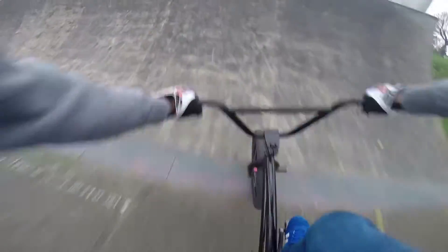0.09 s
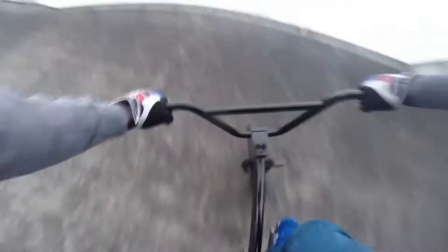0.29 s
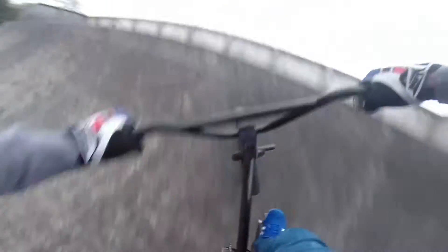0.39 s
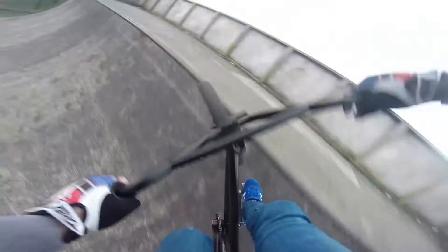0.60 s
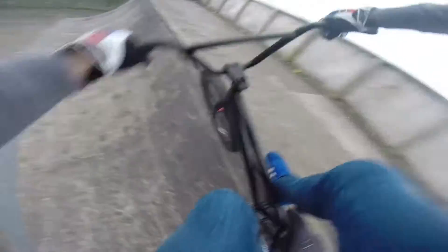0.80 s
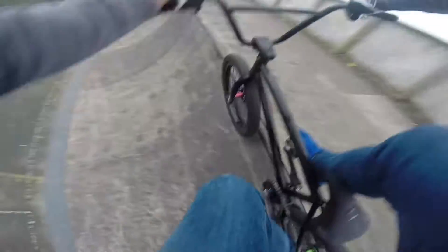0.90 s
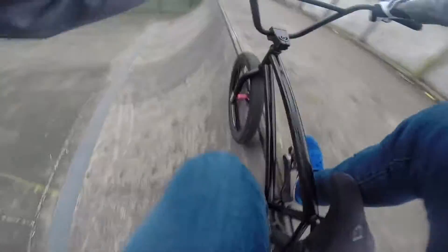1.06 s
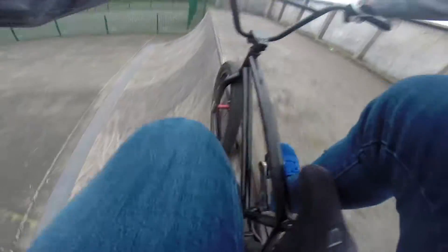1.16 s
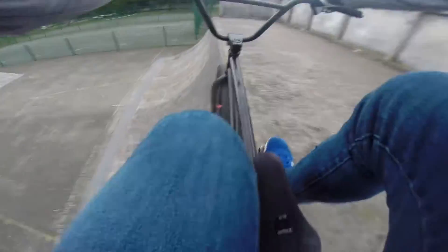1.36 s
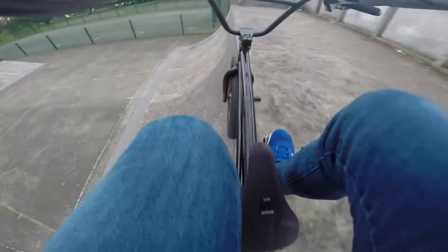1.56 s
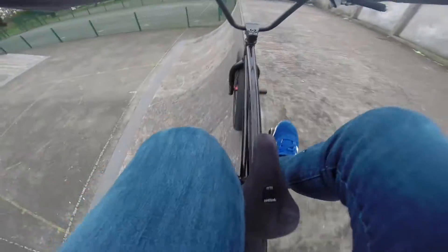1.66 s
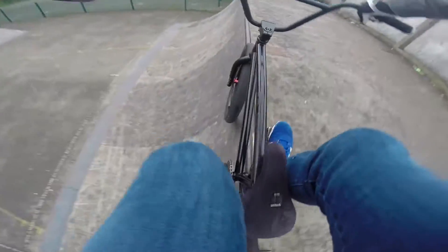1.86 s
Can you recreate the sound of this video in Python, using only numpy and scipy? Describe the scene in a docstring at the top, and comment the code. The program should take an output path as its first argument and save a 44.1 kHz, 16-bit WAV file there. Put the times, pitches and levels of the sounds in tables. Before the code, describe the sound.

BMX bike rolls over concrete, hops, and clanks into a short scraping peg grind.

```python
"""BMX peg grind on a ledge

A BMX bike coasts up a concrete ramp, hops, and lands two steel pegs on a ledge, where they grind along.
The freewheel ticks throughout; the tyres hiss and the frame rumbles. The microphone rides on the rider's
chest, close above the bike: its case is knocked a few times, and air buffets it."""
import sys
import numpy as np
from scipy import signal
from scipy.fft import rfft, irfft
from scipy.io import wavfile

SR = 44100
rng = np.random.default_rng(int(sys.argv[2]) if len(sys.argv) > 2 else 0)


def to_wav(sig):
    """Store sig (one row per channel, or 1-D mono) as 16-bit WAV at the path in sys.argv[1].

    Samples outside -1..1 are clipped; the rate is SR.
    """
    pcm = np.clip(np.atleast_2d(sig), -1, 1) * 32767
    pcm = np.round(pcm).astype(np.int16)
    wavfile.write(sys.argv[1], SR, pcm.T)  # frames by channels


N = 83790
T = np.arange(N) / SR


def from_db(db):
    """Decibels to gain."""
    return 10 ** (np.asarray(db) / 20)


def rms_one(x):
    """Scale to rms 1."""
    return x / np.sqrt(np.mean(x ** 2) + 1e-20)


def level(rows):
    """Gain over time from rows of (time [s], level [dB])."""
    return from_db(np.interp(T, *np.transpose(rows)))


def coloured(spectrum, source=None):
    """White noise, or a given source, shaped by a spectrum that falls away at both ends; rms 1."""
    source = rng.standard_normal(N) if source is None else source
    hz, db = np.transpose(spectrum)
    f = np.maximum(np.arange(N // 2 + 1) * SR / N, 1)
    skirts = np.minimum(f / hz[0], 1) ** 2 * np.minimum(hz[-1] / f, 1) ** 2
    shape = from_db(np.interp(np.log(f), np.log(hz), db))
    return rms_one(irfft(rfft(source) * skirts * shape, N))


def drift(rate_hz):
    """Smooth random wander, rms 1."""
    r = np.exp(-2 * np.pi * rate_hz / SR)
    return rms_one(signal.lfilter([1], [1, -2 * r, r * r], rng.standard_normal(2 * N))[N:])


def clicks(rows):
    """One impulse for each row of (time [s], level [dB])."""
    out = np.zeros(N) + 1e-18
    for s, db in rows:
        out[int(s * SR)] += from_db(db)
    return out


def ring(force, modes):
    """A force sets decaying modes ringing, with alternating signs."""
    out = np.zeros(N)
    for k, (hz, db, t60) in enumerate(modes):
        r, w = np.exp(-np.log(1000) / (t60 * SR)), 2 * np.pi * hz / SR
        mode = signal.lfilter([0, np.sin(w)], [1, -2 * r * np.cos(w), r * r], force)
        out += (-1) ** k * from_db(db) * mode
    return out


def dying(force, t60):
    """Envelope that jumps at each impulse and falls 60 dB in t60 seconds."""
    return signal.lfilter([1], [1, -np.exp(-np.log(1000) / (t60 * SR))], force)


def swell(start, length, db):
    """Rounded envelope of one short sound."""
    return from_db(db) * np.sqrt(np.abs(np.sin(np.pi * np.clip((T - start) / length, 0, 1))))


def grit(grains_per_s=5000, spread_db=2):
    """Dense random clicks of uneven size."""
    sizes = from_db(spread_db * np.minimum(rng.exponential(1, N), 5)) * rng.choice([-1, 1], N)
    return sizes * (rng.random(N) < grains_per_s / SR)


def freewheel(peak_s=.0022, flicker_db=1.8):
    """Each pawl drop is a fine click with a short rattle of the hub; the rate follows the rear wheel."""
    # the coasting hub: (time [s], tick rate [1/s], rattle level [dB], click level [dB])
    coasting = [(0, 75, -62.5, -72), (.35, 98, -64, -78), (0.601, 88, -55.5, -80), (.72, 84, -56, -77),
                (.82, 87, -52.5, -74), (1.001, 72, -50.5, -65), (1.3, 51, -50, -63.5), (1.5, 48, -58, -72),
                (1.9, 48, -58, -73)]
    # hub rattle and pawl click: (frequency [Hz], density [dB])
    hub = [(1600, -16), (2200, 2), (2750, -8), (3400, 7), (4000, -15.5), (5000, -5), (8000, -26)]
    pawl = [(6500, -8), (9500, -6), (12500, 0), (14500, -31)]
    times, *columns = np.transpose(coasting)
    rate, rattle_db, click_db = [np.interp(T, times, column) for column in columns]
    since_tick = (np.cumsum(rate) / SR % 1) / rate
    age = since_tick / peak_s
    ticks = rms_one(age * np.exp(-age)) * from_db(flicker_db * drift(23))
    return ticks * (from_db(rattle_db) * coloured(hub) + from_db(click_db) * coloured(pawl))


def wheels(whirr_db=-9):
    """Below the rider the tyres hiss on concrete and the spinning bearings whirr."""
    # rolling hiss and open air: (time [s], level [dB])
    loudness = [(0, -56.5), (.18, -49.5), (.3, -48.5), (.37, -49.5), (.43, -54), (.55, -57.5), (.65, -51.5),
                (.69, -60), (.85, -53), (1.0, -47.5), (1.8, -57.5), (1.9, -63)]
    # tyre hiss: (frequency [Hz], density [dB])
    tyre = [(240, -50), (400, -7.5), (867, -1), (1390, -4.5), (1540, -36), (2190, 7), (3150, -9.5),
            (3390, -6), (3890, -4), (5110, 0.5), (6920, -14.5), (13100, -22.5), (15000, -23)]
    # bearing modes: (frequency [Hz], level [dB], t60 [s])
    bearings = [(3306, 7, 0.081), (4877, 9.5, .06), (6010, 4.5, 0.1), (7350, -1, 0.16)]
    hiss = coloured(tyre)
    whirr = rms_one(ring(rng.standard_normal(N), bearings))
    return level(loudness) * (hiss + from_db(whirr_db) * whirr)


def frame():
    """The frame rumbles along, and thuds over bumps and as the weight comes down."""
    # running rumble and single thuds: (time [s], level [dB])
    loudness = [(0, -48), (.18, -54.5), (.22, -37.5), (.315, -32.5), (.44, -37.5), (.55, -41.5), (.62, -46),
                (.7, -54), (.92, -53.5), (.99, -43.5), (1.06, -44.5), (1.14, -27.5), (1.23, -42),
                (1.45, -35.5), (1.55, -45.5), (1.66, -48.5), (1.71, -39.5), (1.77, -43.5), (1.9, -55.5)]
    thuds = [(.299, -2.5), (.311, -28), (1.094, -2.5), (1.124, 4)]
    # rumble: (frequency [Hz], density [dB])
    rumble = [(55, -22.5), (100, 3), (150, -6), (200, -8), (300, -11), (420, -15.5), (600, -33),
              (1200, -31)]
    # frame modes: (frequency [Hz], level [dB], t60 [s])
    modes = [(68, -27, 0.29), (85.6, -23, 0.066), (183, -18, 0.049), (287, -29, 0.107), (363, -30, 0.11)]
    return level(loudness) * coloured(rumble) + ring(clicks(thuds), modes)


def buffeting():
    """Lumpy air hits the microphone, and the hop jolts it into a deep sway."""
    # gusts and the jolt: (time [s], level [dB])
    gusts = [(0, -28), (.17, -35.5), (.22, -25.5), (.27, -34), (.5, -37.5), (.64, -22), (.72, -43),
             (.93, -40.5), (.98, -24), (1.12, -23), (1.22, -35.5), (1.62, -48.5), (1.72, -34.5),
             (1.78, -39), (1.9, -33.5)]
    jolts = [(.566, 3)]
    # wind on the microphone: (frequency [Hz], density [dB])
    wind = [(12, -13), (28, -2), (40, -4.5), (65, -22.5), (120, -25.5), (400, -107)]
    # the microphone's sway: (frequency [Hz], level [dB], t60 [s])
    sway = [(31.1, -7, 0.26), (48.2, -1.5, 0.026), (130, -10.5, 0.02)]
    return level(gusts) * coloured(wind) + ring(clicks(jolts), sway)


def whistles(waver_hz=20):
    """Friction holds one steel mode singing for a moment, its pitch wavering."""
    # thin tones of spinning and sliding steel: (start [s], length [s], frequency [Hz], level [dB])
    tones = [(-.02, .06, 5020, -53.5), (.04, .19, 3350, -60), (1.26, .18, 3430, -51.5),
             (1.43, .23, 4280, -56)]
    waver = waver_hz * drift(40)
    return sum(swell(start, length, db) * rms_one(np.sin(2 * np.pi * np.cumsum(hz + waver) / SR))
               for start, length, hz, db in tones)


def tyre_scuffs():
    """Rubber rubs on concrete in short, grainy scuffs."""
    # scuffs: (start [s], length [s], level [dB])
    scuffs = [(.222, 0.031, -34), (.355, 0.022, -40.5), (.568, 0.027, -41), (.888, 0.021, -45),
              (.991, 0.011, -39.5)]
    # rubbing rubber: (frequency [Hz], density [dB])
    rubber = [(400, -26.5), (1150, -4), (1700, -8.5), (2900, -10), (3600, -24), (4900, -16.5),
              (9000, -44.5)]
    return sum(swell(*scuff) for scuff in scuffs) * coloured(rubber, grit())


def case_knocks(rattle_s=.0055, mount_lag_s=.00317):
    """Hard taps ring the microphone's case and rattle it in its clip; its mount thumps just after."""
    # taps: (time [s], level [dB], contact brightness [Hz], rattle level [dB])
    knocks = [(0.2551, -8.5, 2800, -32), (.390, 0.5, 9600, -17), (.4915, -5.5, 5500, -23),
              (1.783, -24.5, 1900, -32)]
    # case and mount modes: (frequency [Hz], level [dB], t60 [s])
    case = [(623, -8, 0.007), (860, -17, 0.021), (1212, -9.5, 0.011), (1405, -17.5, 0.033),
            (2130, -1, 0.017), (2306, 0, 0.0068), (2896, -11.5, 0.015), (3637, -13.5, 0.016),
            (4690, -13.5, 0.0064), (5250, -14, 0.009), (6200, -24.5, 0.0088), (7230, -29.5, 0.0084),
            (9760, -39, 0.0044)]
    mount = [(112.7, -11, 0.079), (171.4, -13, 0.097), (339, -14.5, 0.037)]
    clack = [(500, 0), (2600, 0), (6000, -7), (9000, -36)]
    out, noise = np.zeros(N), coloured(clack)
    for s, db, bright_hz, rattle_db in knocks:
        fade = (T >= s) * np.sqrt(np.clip(1 - (T - s) / rattle_s, 0, 1))
        tap = ring(clicks([(s, db)]), case) + from_db(rattle_db) * fade * noise
        r = np.exp(-2 * np.pi * bright_hz / SR)
        out += signal.lfilter([1 - r], [1, -r], tap)  # a softer contact loses treble
        out += ring(clicks([(s + mount_lag_s, db)]), mount)
    return out


def clothing():
    """The rider's clothes swish close to the microphone during the hop."""
    # swishes: (start [s], length [s], level [dB])
    swishes = [(.93, 0.034, -41), (1.015, 0.02, -39.5), (1.053, 0.035, -33)]
    # rubbing cloth: (frequency [Hz], density [dB])
    cloth = [(600, -15.5), (2300, -9), (3370, 1), (4000, -17), (4940, -12), (8400, -32)]
    return sum(swell(*swish) for swish in swishes) * coloured(cloth, grit())


def peg_landing(hits, modes, crunch_db, sharp_share=.065, settle_s=.004):
    """A steel peg clanks on the ledge, sliding down in pitch as it seats, and crushes some concrete."""
    force = clicks(hits)
    age = np.maximum(T - hits[0][0], 0)
    bent_time = age + sharp_share * settle_s * (1 - np.exp(-age / settle_s))
    clank = sum((-1) ** k * from_db(db) * dying(force, t60) * np.sin(2 * np.pi * hz * bent_time)
                for k, (hz, db, t60) in enumerate(modes))
    # crushed concrete: (frequency [Hz], density [dB])
    concrete = [(300, -5), (750, -7), (1200, -16), (1650, 6.5), (2000, -8.5), (3400, -8), (3980, -24.5),
                (4400, -3.5), (6800, -21.5), (8200, -18), (11700, -24.5), (15000, -42)]
    burst = dying(force, t60=.061) - dying(force, t60=.003)  # the short decay rounds the attack
    tail = from_db(-18) * dying(force, t60=.53)
    return clank + from_db(crunch_db) * (burst + tail) * coloured(concrete)


def front_peg():
    """The front peg lands first and chatters; the ledge then chokes its ring."""
    # contacts and choking: (time [s], level [dB])
    hits = [(1.0880, 0), (1.096, -9), (1.1015, -6)]
    damping = [(1.109, 0), (1.112, -9)]
    # peg modes: (frequency [Hz], level [dB], t60 [s])
    modes = [(1530, -22, 0.02), (1700, -25, 0.1), (3100, -19, 0.018), (4600, -17.5, 0.075),
             (4900, -24, 0.016), (8450, -33, 0.055), (11750, -37, 0.044)]
    return level(damping) * peg_landing(hits, modes, crunch_db=-22)


def rear_peg():
    """The rear peg lands a moment later, bounces faintly and rings on."""
    # contacts: (time [s], level [dB])
    hits = [(1.1208, 0.5), (1.1335, -24)]
    # peg modes: (frequency [Hz], level [dB], t60 [s])
    modes = [(1624, -21, 0.062), (1686, -16, 0.05), (1795, -15, 0.048), (2150, -9, 0.017),
             (2562, -37, 0.45), (2800, -24, 0.03), (4345, -19, 0.14), (4395, -26, 0.26), (5150, -20, 0.02),
             (7450, -39, 0.18), (7900, -21, 0.018), (11520, -40.5, 0.24), (13750, -36, .025)]
    return peg_landing(hits, modes, crunch_db=-14.5)


def grind(rough_db=2, sing_db=-7, waver_db=3.5):
    """Grit under the sliding pegs rasps and keeps the steel singing; each mode comes and goes."""
    # the slide along the ledge: (time [s], level [dB])
    loudness = [(1.1, -54), (1.14, -49), (1.25, -36.5), (1.33, -42), (1.42, -45), (1.69, -44), (1.82, -56),
                (1.9, -59)]
    # steel scraping concrete: (frequency [Hz], density [dB])
    scrape = [(300, 5), (550, -1.5), (780, 1), (1080, -5.5), (1540, 2.5), (1850, -2), (2600, -1),
              (3050, -4), (3450, -2), (4000, -18), (4600, -18), (7400, -18), (9000, -40), (15000, -31)]
    # modes of the sliding steel: (frequency [Hz], level [dB], t60 [s])
    modes = [(1560, -7, .035), (2680, 1, .04), (2850, -2, .045), (3400, -6, .025)]
    rasp = coloured(scrape, grit() * from_db(rough_db * drift(18.5)))
    force = grit()
    singing = sum(ring(force, [mode]) * from_db(waver_db * drift(8)) for mode in modes)
    return level(loudness) * (rasp + from_db(sing_db) * rms_one(singing))


def scene():
    """The ride in mono, as heard from the rider's chest."""
    impacts = case_knocks() + front_peg() + rear_peg()
    riding = grind() + freewheel() + tyre_scuffs() + clothing() + wheels() + frame()
    return (impacts + riding + buffeting() + whistles())[None]


def record(dry, stopband_hz=16000):
    """The recorder adds a faint steady whine, clips the peaks and cuts the top."""
    # whine of the electronics: (frequency [Hz], rms level [dB])
    tones = [(8781, -74)]
    whine = sum(np.sqrt(2) * from_db(db) * np.sin(2 * np.pi * hz * T) for hz, db in tones)
    lowpass = signal.cheby2(16, 60, stopband_hz, fs=SR, output="sos")
    return signal.sosfilt(lowpass, np.clip(dry + whine, -1, 1))


dry = scene()
out = record(dry)
to_wav(out)
```